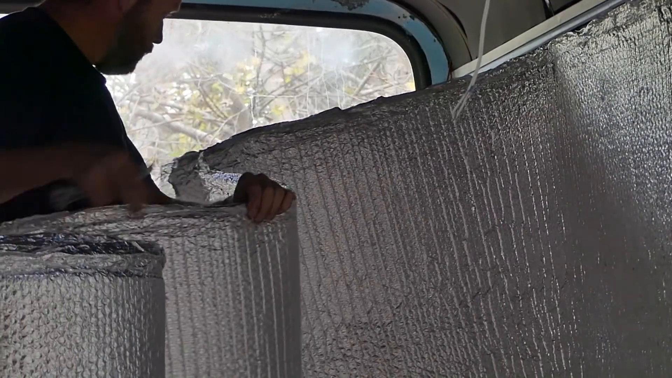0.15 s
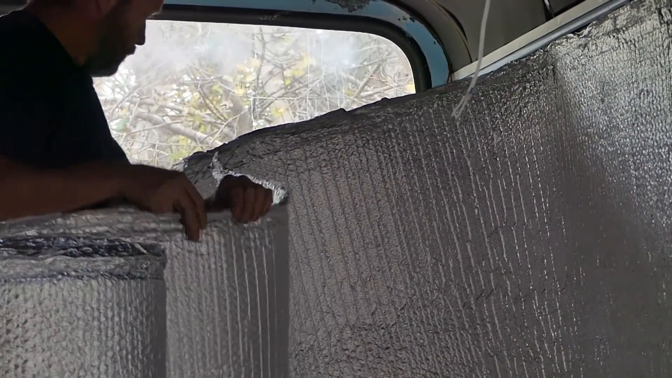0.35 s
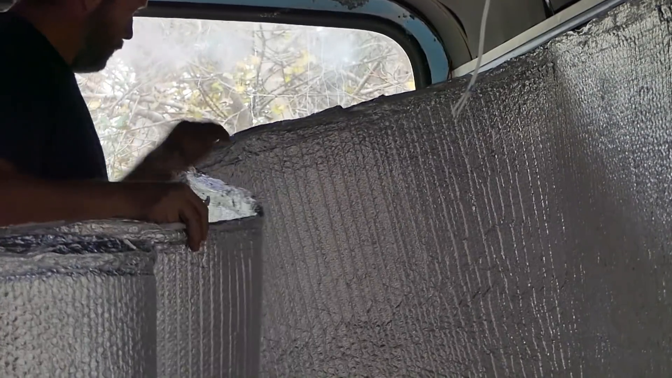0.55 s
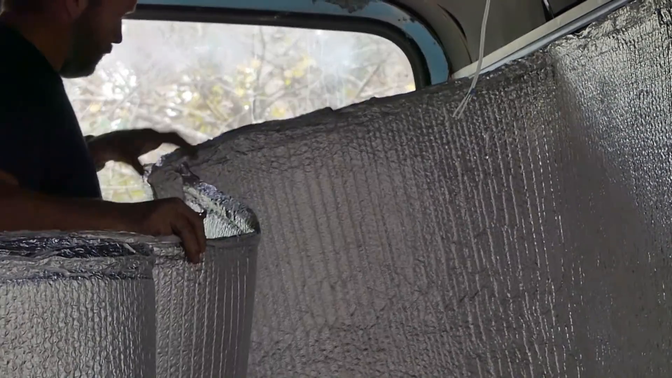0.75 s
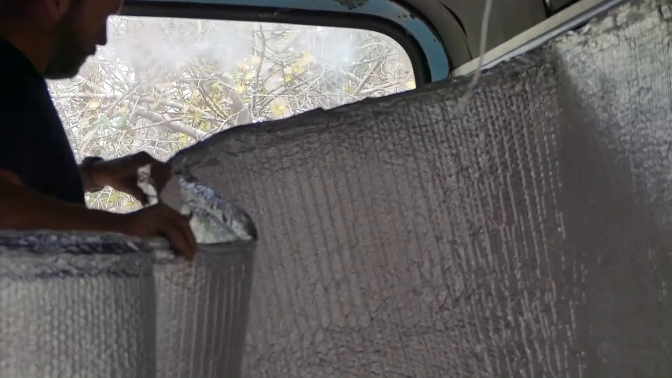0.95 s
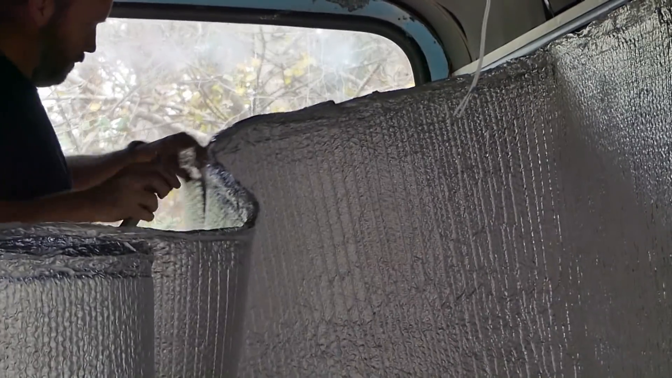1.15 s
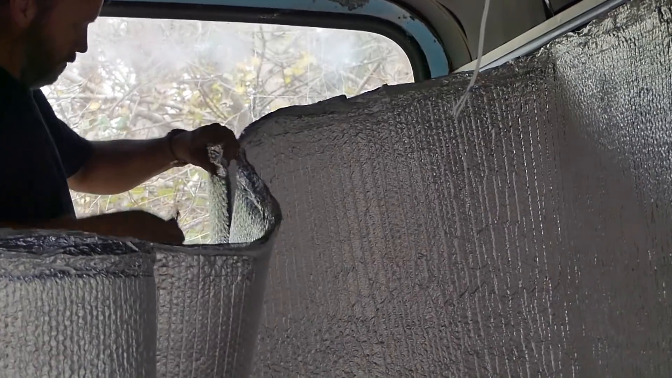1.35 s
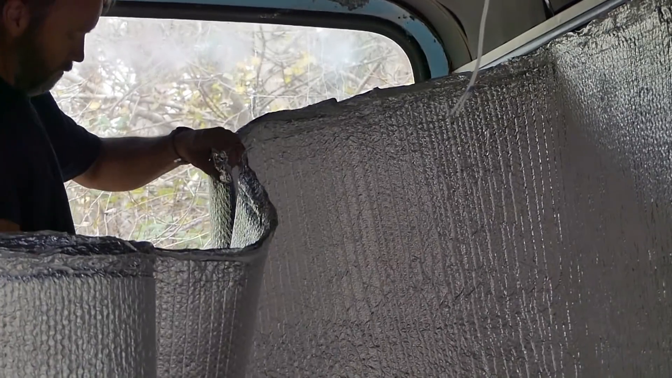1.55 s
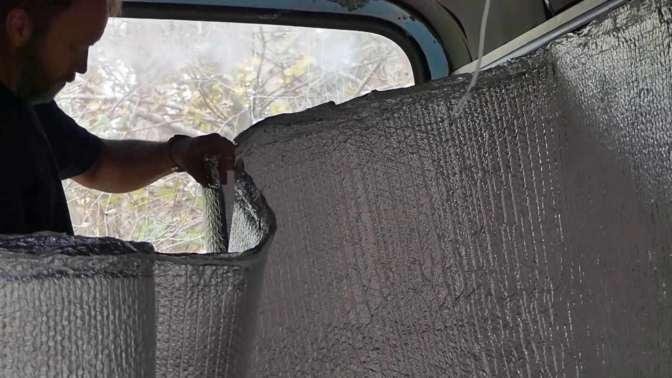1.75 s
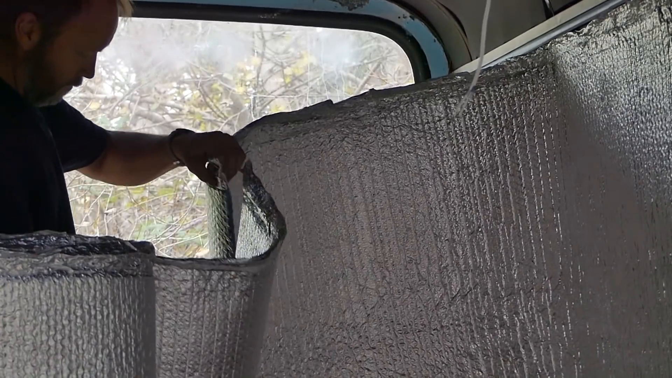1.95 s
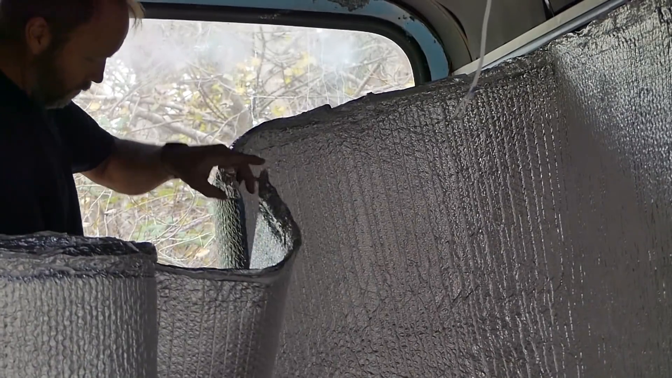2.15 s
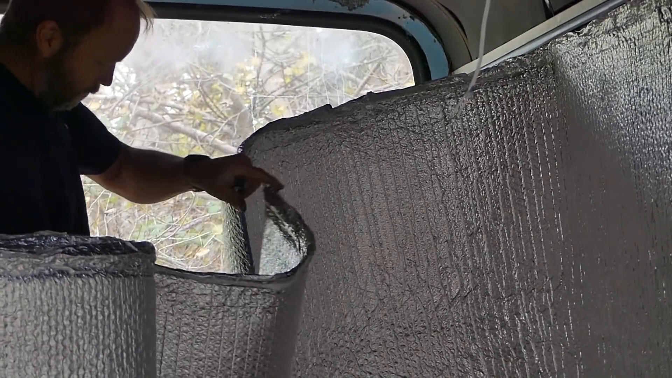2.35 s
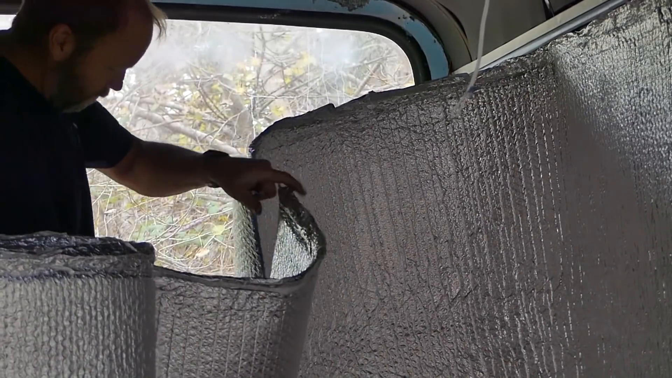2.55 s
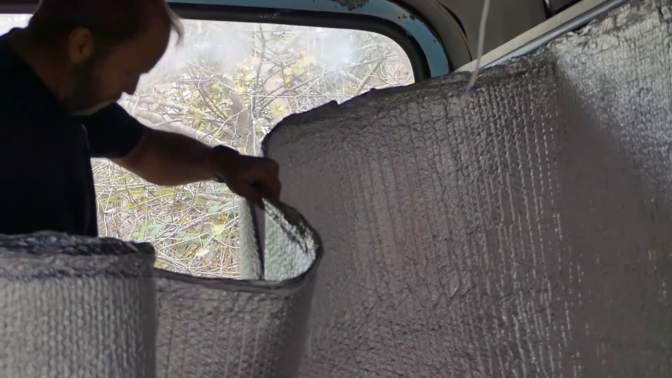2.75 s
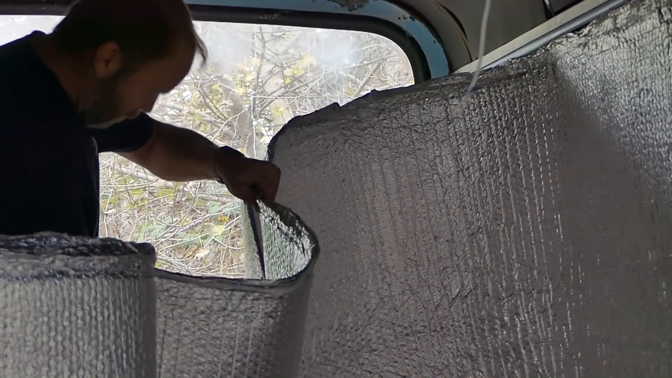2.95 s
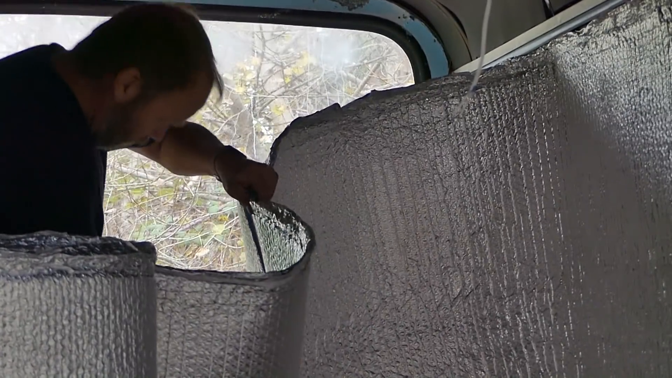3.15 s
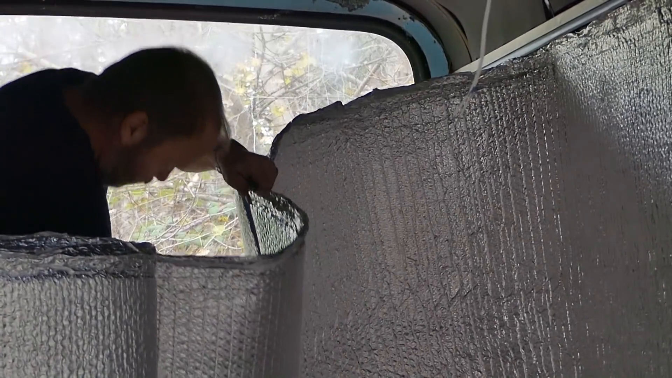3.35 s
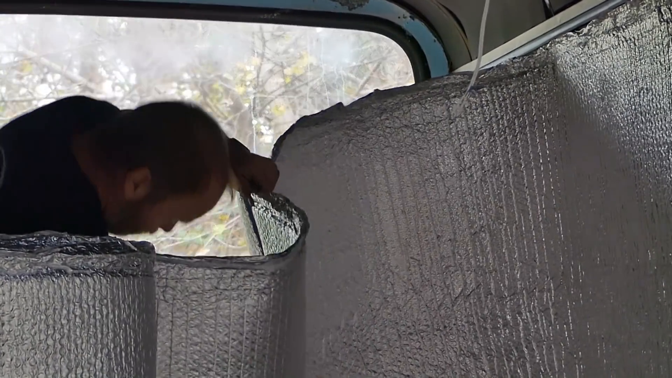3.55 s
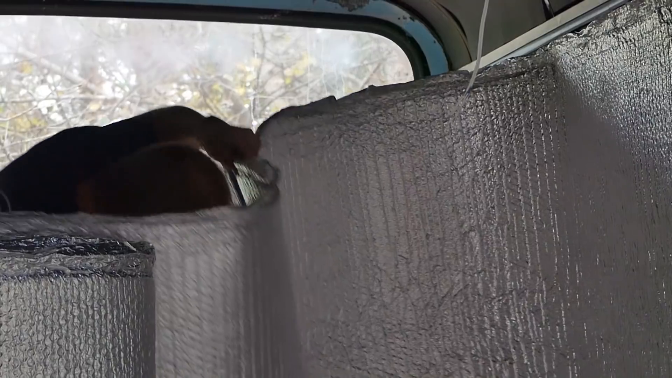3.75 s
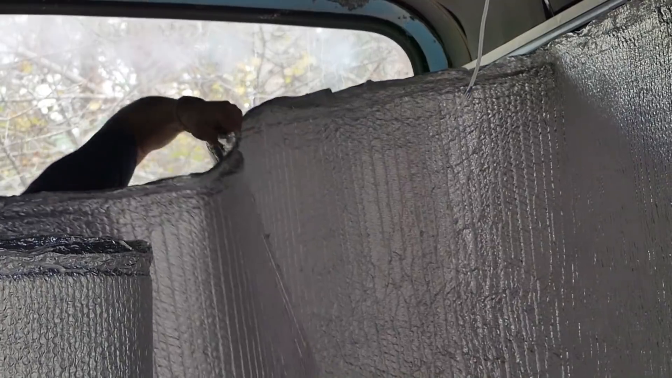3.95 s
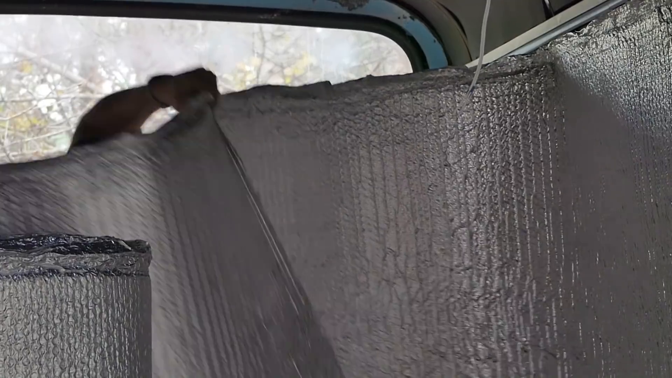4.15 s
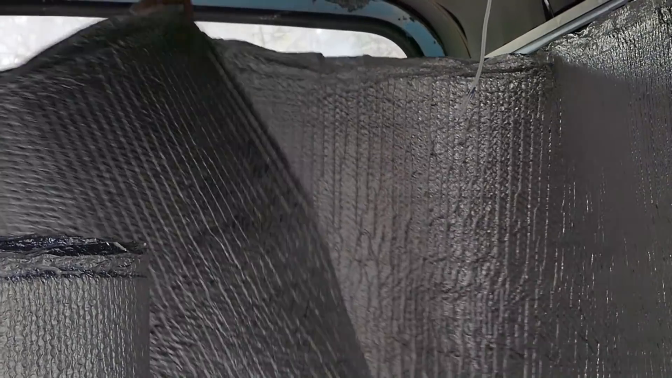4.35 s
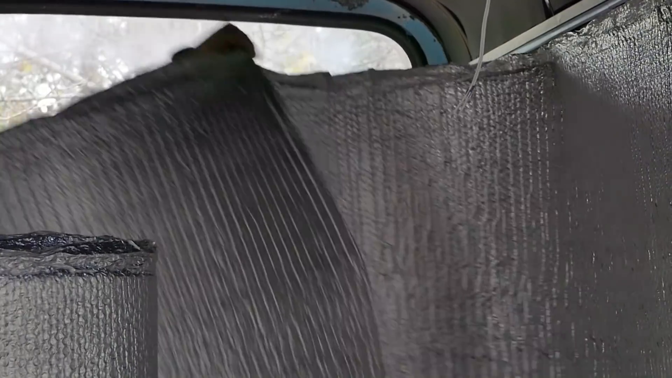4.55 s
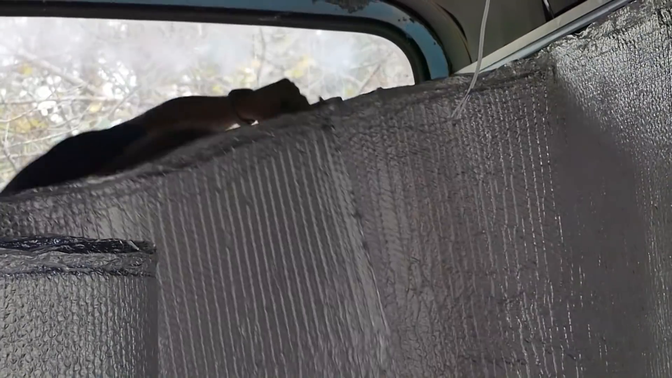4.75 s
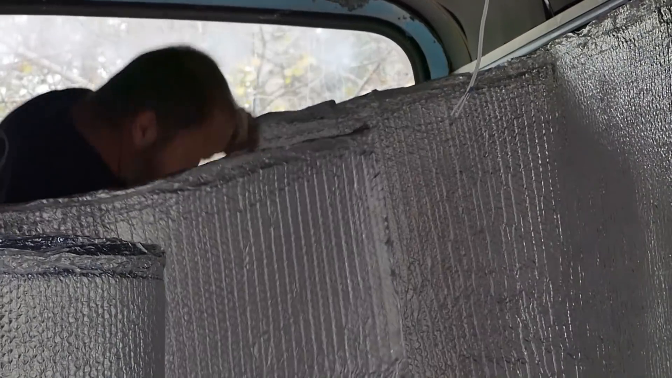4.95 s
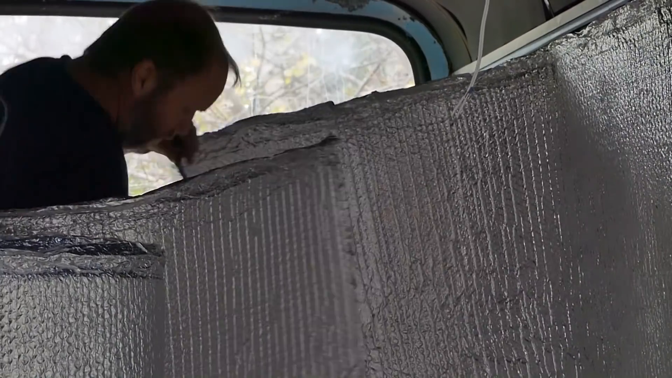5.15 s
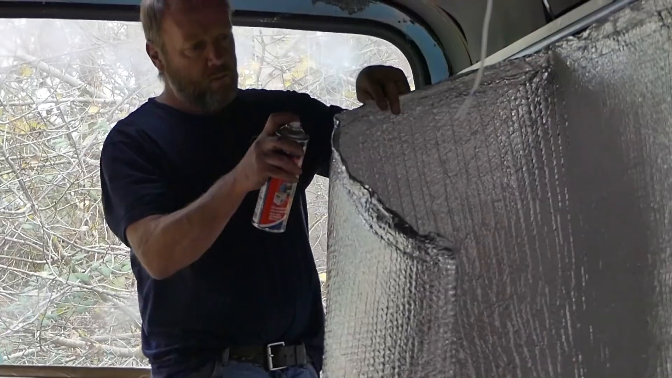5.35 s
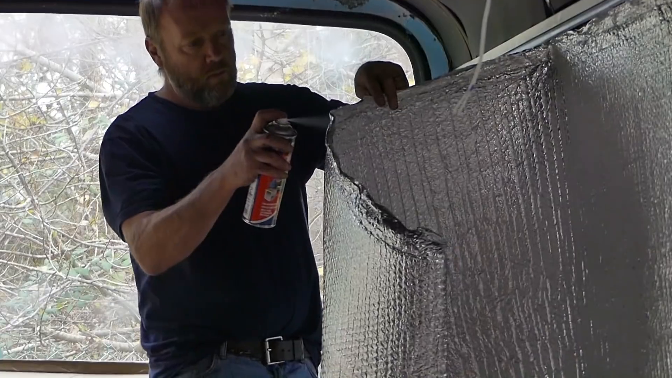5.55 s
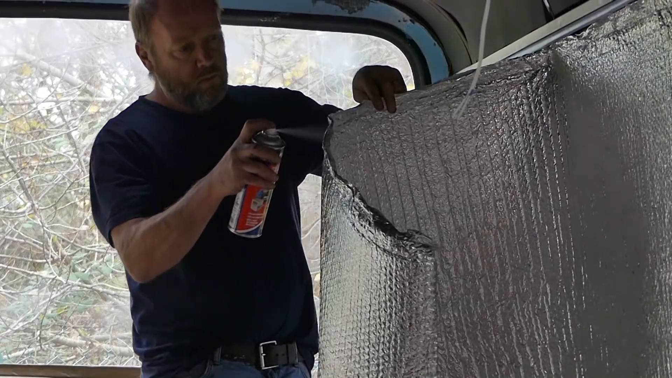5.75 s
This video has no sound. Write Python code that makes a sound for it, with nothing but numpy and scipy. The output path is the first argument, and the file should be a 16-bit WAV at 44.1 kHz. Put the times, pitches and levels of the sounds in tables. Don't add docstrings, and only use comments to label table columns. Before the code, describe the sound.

Foil-faced bubble insulation crinkles, ticks and thumps under handling, is dragged with loud sharp cracks, then a spray can hisses.

```python
import sys
import numpy as np
from scipy import signal
from scipy.fft import rfft, irfft
from scipy.io import wavfile
from scipy.ndimage import uniform_filter1d

SR = 44100
rng = np.random.default_rng(int(sys.argv[2]) if len(sys.argv) > 2 else 0)


def to_wav(sig):
    pcm = np.clip(np.atleast_2d(sig), -1, 1) * 32767
    pcm = np.round(pcm).astype(np.int16)
    wavfile.write(sys.argv[1], SR, pcm.T)


def linear_from_db(decibels):
    return 10 ** (np.asarray(decibels, float) / 20)


N = 256220

# frequency in Hz, density in dB per Hz.
AIR_SPECTRUM = [(30, -21), (160, -6.5), (430, 0.5), (870, -8), (1200, -9.5), (2000, -15.5), (3500, -12.5),
                (5500, -17), (7500, -20), (10000, -17), (15500, -16.5)]
AIR_DB, AIR_AFTER_HIGHPASS_HZ = -46.5, 95
# frequency in Hz, density in dB per Hz.
RUMBLE_SPECTRUM = [(30, -8), (60, -12), (100, -7), (125, 7), (170, -1), (260, -11), (400, -49)]
RUMBLE_DB = -66.5

# start of full strength in seconds, hold in seconds,
# crinkle in dB, sparkle in dB over the crinkle.
CREASES = [(-0.01, 0.092, -44.5, -6), (0.155, 0.004, -40.5, -5.5), (0.214, 0.095, -46, -9),
           (0.389, 0.053, -45, -3), (0.467, 0.058, -37, -7.5), (0.572, 0.065, -40.5, -7.1),
           (0.737, 0.0028, -34.5, -16), (0.793, 0.088, -39, -10), (0.963, 0.11, -37.5, -5),
           (1.181, 0.24, -40.5, -8), (1.5, 0.099, -41.5, -8), (1.653, 0.13, -43, -9),
           (1.84, 0.029, -45, -8), (1.947, 0.16, -46, -4.5), (2.07, 0.087, -48, -7),
           (2.285, 0.092, -44, -5.5), (2.398, 0.016, -38, -11), (2.498, 0.048, -41.5, -7),
           (2.694, 0.1, -41, -6), (2.827, 0.11, -42.5, -8), (3.001, 0.18, -41, -4.5),
           (4.415, 0.077, -36, -9.5), (4.534, 0.075, -44.0, -9), (4.671, 0.11, -35, -10),
           (4.801, 0.051, -38.5, -9), (4.893, 0.12, -41, -8.5), (5.024, 0.051, -45, -17),
           (5.139, 0.003, -38.8, -5.5), (5.173, 0.074, -44.5, -4.5), (5.277, 0.02, -39.5, -8.5)]
CREASE_RISE_DB_PER_S, CREASE_FALL_DB_PER_S = 165, 253
# start of full strength in seconds, hold in seconds,
# drumming in dB, scrape in dB over the drumming.
PUSHES = [(-0.015, 0.014, -41.5, -0.5), (0.069, 0.092, -58.5, 12), (0.17, 0.0027, -38.5, -3),
          (0.276, 0.031, -50, -6), (0.381, 0.065, -48.5, 3), (0.462, 0.0075, -43.5, -3.5),
          (0.62, 0.073, -45, -0.5), (0.728, 0.043, -43, 3.5), (0.784, 0.14, -37.5, -2),
          (1.01, 0.055, -37, -2), (1.283, 0.012, -52.5, 1), (1.39, 0.18, -48, -1.5),
          (1.58, 0.087, -50.5, 0.5), (1.765, 0.017, -48.5, 1.5), (1.964, 0.041, -43.5, -4),
          (2.105, 0.006, -54.5, -2), (2.26, 0.03, -49, 0), (2.363, 0.086, -51.5, -1),
          (2.49, 0.059, -67.5, 9), (2.681, 0.097, -54, 1), (2.8, 0.05, -45, -3), (2.98, 0.12, -64, 3),
          (4.398, 0.13, -43, -4.5), (4.53, 0.17, -54, 2), (4.68, 0.005, -72, 24),
          (4.758, 0.0035, -33.5, -8.5), (4.892, 0.079, -54, 5.5), (5.009, 0.004, -53, -8),
          (5.142, 0.004, -40, -2.5), (5.268, 0.06, -48.5, -4)]
PUSH_RISE_DB_PER_S, PUSH_FALL_DB_PER_S = 276, 141
# start of full strength in seconds, hold in seconds,
# crinkle in dB, drumming in dB over the crinkle, scrape in dB over the crinkle.
DRAGS = [(3.163, 0.0047, -32.5, 3, -8), (3.222, 0.039, -31.5, 7.5, 0), (3.267, 0.055, -28, 7, 2.5),
         (3.345, 0.084, -27, 5, 3.5), (3.456, 0.024, -32, 10.5, -0.5), (3.49, 0.0088, -42, -1, 0),
         (3.52, 0.042, -51, 16, -8), (3.572, 0.051, -29.5, 6.5, 4.5), (3.645, 0.069, -27, 3.5, 3.5),
         (3.735, 0.062, -30, 6.5, 4.5), (3.82, 0.055, -29.5, 7, 3.5), (3.885, 0.05, -31.5, 6.5, 2.5),
         (3.977, 0.024, -38, 7, -3), (4.043, 0.021, -35.5, 0.5, -4.5), (4.118, .015, -33, 7.5, 2.5),
         (4.145, 0.025, -28, 6, 2.5), (4.177, 0.16, -29.5, 7, 4), (4.324, 0.025, -32, 9, 7.5)]
DRAG_RISE_DB_PER_S, DRAG_FALL_DB_PER_S = 546, 306
DRAG_SPARKLE_DB = -10
REST_DB = -91
SCRAPE_DB = 2.5
CLUMP_DB, CLUMP_S = 1.2, 0.003
FLICKER_DB, FLICKER_S = 1.5, 0.017

# frequency in Hz, density in dB per Hz.
CRINKLE_SPECTRUM = [(880, -40), (1500, -15.5), (1910, -8), (2650, -7.5), (3100, -2), (3980, 0.5),
                    (6330, -2.5), (7690, -9), (9000, -9.5), (11700, -15), (19800, -120)]
# frequency in Hz, density in dB per Hz.
SPARKLE_SPECTRUM = [(6000, -12), (7700, 2.5), (8500, -0.5), (10000, 6.5), (11500, -1.5), (13000, 2.5),
                    (14500, -4.5), (15600, -7)]
# frequency in Hz, density in dB per Hz.
SCRAPE_SPECTRUM = [(380, -18), (600, -2.5), (800, 4.5), (1070, 3.5), (1250, 1.5), (1600, -1), (2050, -1),
                   (2800, -2), (3700, -9), (6000, -80.5)]
# frequency in Hz, width in Hz, level in dB.
FACES = [(1526, 96, -23.5), (2030, 170, -16), (3220, 210, -13), (4040, 210, -16)]
# frequency in Hz, width in Hz, level in dB.
SHEET_MODES = [(125, 51, -7), (195, 45, 1), (279, 43, -4), (335, 28, -2), (434.7, 28, -0.5),
               (501.7, 20.6, -1), (574.4, 26.4, 0), (656, 69, -3), (754.4, 17, -5), (834, 28, -4),
               (980, 110, -9), (1074, 22, -6.5), (1193, 59, -6), (2060, 11, -15)]
# time in seconds, pitch in Hz.
BULGE_PITCH = [(0, 416), (.2, 405), (.8, 454), (1.1, 477), (1.62, 480), (1.95, 345), (2.78, 375),
               (3.07, 344), (3.2, 435), (3.75, 434), (3.95, 286), (4.1, 257), (4.21, 380), (4.36, 356),
               (4.8, 370), (5.3, 408)]

# time in seconds, peak in dB, pitch in Hz.
TICKS = [(.0019, -40, 1120), (.0571, -37, 1080), (.1126, -31, 1250), (.4171, -38, 1200), (.5028, -26, 3830),
         (.5287, -27, 4390), (.5754, -30, 3960), (0.722, -22, 5400), (.7296, -19, 3900),
         (.7292, -19.5, 6300), (.7336, -22, 4560), (.7365, -22, 5300), (.741, -23, 4600),
         (.7594, -23, 1110), (.8573, -26, 3790), (1.0624, -28, 5600), (1.2181, -26, 4050),
         (1.3154, -25, 4180), (1.4197, -26, 3880), (1.4258, -27, 3960), (1.6008, -32, 3400),
         (2.4154, -30, 4180), (2.8024, -30, 4180), (2.9084, -31, 5770), (3.0516, -31, 4000),
         (3.2397, -15, 3700), (3.3513, -14, 1110), (3.6288, -16, 3750), (3.678, -15, 3530),
         (3.7884, -16, 3920), (3.837, -17, 3620), (3.9285, -26, 3360), (4.153, -20, 1120),
         (4.1539, -17, 3270), (4.1791, -24, 2550), (4.2004, -22, 3750), (4.2382, -21, 3320),
         (4.294, -14, 1500), (4.3095, -16, 1080), (4.319, -17, 5500), (4.4398, -24, 4030),
         (4.6928, -36, 730), (4.8015, -28, 4480), (4.9694, -30, 4050), (5.1255, -38, 2100)]
TICK_RING_S, TICK_RISE_S = 0.001, 0.00015
# start in seconds, level in dB, pitch in Hz,
# rise in seconds, ring in seconds.
BOOMS = [(0.441, -57, 116, 0.03, 0.31), (0.161, -37.5, 336, 0.011, 0.33), (0.859, -39, 490, 0.014, .2),
         (1.001, -41, 460, 0.019, 0.27), (1.06, -35, 564, 0.043, 0.17), (1.278, -40.5, 900, 0.0049, 0.034),
         (1.305, -46, 1020, 0.0047, 0.046), (1.409, -45, 139, 0.048, .2), (1.96, -40.5, 125, 0.025, 0.22),
         (2.84, -43.5, 222, .03, 0.083), (3.299, -23.5, 1070, 0.071, 0.32), (3.36, -20, 564, 0.051, 0.27),
         (3.468, -21, 214, 0.0088, 0.14), (3.88, -28.5, 187, 0.047, 0.49), (4.15, -26, 2022, 0.035, 0.41),
         (4.201, -19.5, 499, 0.021, 0.11), (4.272, -27, 190.8, 0.0062, 0.52), (4.329, -23, 359, 0.017, 0.3),
         (4.68, -56, 700, 0.03, 0.15), (4.752, -26.5, 303, 0.0068, 0.084), (4.78, -35, 207, 0.018, 0.078),
         (0.0, -46, 111, 0.0059, 0.087), (2.81, -51, 108, 0.034, 0.22), (4.42, -47, 106, 0.019, .15),
         (.72, -39, 891, 0.0088, .3), (.77, -38, 496, 0.027, .15), (0.829, -40, 445, 0.017, .1),
         (0.901, -36, 484, 0.019, 0.15), (1.045, -38, 488, 0.017, 0.091), (3.25, -21, 405, 0.014, 0.16),
         (3.42, -25, 587, 0.024, 0.16), (3.56, -26.5, 990, 0.035, 0.26), (3.62, -23, 436.7, 0.036, 0.21),
         (3.675, -21.5, 334, 0.024, 0.14), (3.66, -26, 2070, 0.028, .1), (3.78, -26.5, 972, 0.048, 0.45),
         (3.83, -22.5, 235, 0.033, 0.12), (3.874, -23, 458, 0.025, 0.073), (4.759, -36, 470, 0.015, 0.12),
         (5.0, -41.5, 382, 0.011, 0.094),
         (1.76, -53, 115, 0.033, .15), (1.97, -47, 300, .03, .2), (2.27, -52.5, 170, .03, .15),
         (2.37, -52, 148, .04, .25), (3.3, -51, 205, 0.027, .12), (2.8, -46, 545, 0.047, .2),
         (3.5, -52, 325, 0.037, .25), (4, -35.5, 320, .02, 0.41), (4.8, -55, 420, 0.025, 0.3),
         (5.132, -35, 2020, 0.0055, 0.048), (4.1, -42, 1640, 0.0056, .07), (5.135, -32, 860, 0.0038, .09),
         (3.4, -23, 770, 0.023, 0.14), (4.15, -26, 630, 0.022, 0.38), (3.6, -28, 550, 0.03, .15),
         (4.746, -27, 340, .008, 0.12), (1.085, -40, 430, 0.023, .1), (.855, -39, 860, 0.017, 0.091),
         (4.765, -35, 600, .01, .1), (3.21, -28, 1090, 0.019, .3), (4.335, -31, 2300, .015, 0.057),
         (3.6, -33.5, 195, .04, 0.26)]
# time in seconds, peak in dB, pitch in Hz, thump in dB over the crack,
# width as a share of pitch.
CRACKS = [(0.15, -26.5, 5000, -5, 0.83), (0.723, -21, 5260, -11, 0.17), (0.7277, -18.5, 5200, -21, 0.29),
          (1.167, -38, 3230, -11, .2), (1.755, -27, 11000, -24, 0.54), (2.056, -30, 4350, -34, 0.28),
          (2.31, -29, 4260, -20, .18), (2.385, -33, 4300, -15, .47), (2.93, -26, 11900, -30, .25),
          (3.164, -30, 3680, -11, .25), (3.209, -13.5, 3300, -13, 0.034), (3.217, -15.5, 3460, -9, 0.078),
          (3.266, -10, 3250, -6, 0.24), (3.273, -8, 3800, -16, 0.15), (3.2877, -12.5, 3230, -15, 0.23),
          (5.14, -24, 1700, -3, 0.3), (3.344, -11, 3350, -33, 0.098), (3.5508, -22, 2900, 1, 0.44),
          (3.565, -12, 3200, -12, 0.13), (4.11, -27, 1620, -22, .2), (4.146, -18, 1550, -29, 0.041),
          (4.349, -12, 2030, -36, .15), (5.1269, -31, 3300, -21, 0.53), (5.131, -22, 1200, -2, 0.41),
          (0.37, -34, 4840, -17, 0.28), (0.393, -33, 4100, -20, .3), (1.4, -42, 3780, -20, .25),
          (1.8417, -29, 3120, -23, 0.28), (1.927, -34, 4130, -22, .3), (2.1294, -33, 3820, -23, 0.23),
          (2.197, -29.5, 4370, -22, 0.2), (2.6204, -38, 4860, -15, 0.46), (3.36, -12, 2310, -15, 0.58),
          (3.397, -16, 2300, -5, 0.37), (3.473, -21, 1900, -7, .45), (3.895, -18, 2200, -16, 0.32),
          (4.038, -27, 3900, -1.5, .3), (4.2, -17, 1790, 1.5, 0.57), (4.308, -19, 1700, -14, 0.43),
          (4.326, -16, 3220, -25, .08)]
TEAR_S, TEAR_S_PER_WIDTH = 0.0092, 0.096
# start in seconds, length in seconds, level in dB, first pitch in Hz,
# last pitch in Hz.
HUMS = [(.83, .05, -37, 438, 447), (.885, .065, -39, 467, 490), (1.0, 0.071, -35, 460, 460),
        (1.084, 0.036, -39, 364, 320), (0.761, 0.096, -41.5, 901, 940), (3.62, 0.089, -23.5, 450, 428),
        (3.7, 0.054, -26, 480, 470), (3.871, 0.047, -26, 460, 450), (4.676, 0.179, -32.5, 355.6, 410),
        (4.771, .05, -41, 260, 200), (4.838, 0.065, -46, 382, 360), (5.17, 0.042, -42.5, 352, 330),
        (5.635, .1, -36, 369, 389), (5.66, 0.094, -42, 151, 150), (3.03, .05, -57, 209, 210)]

CUT_S = 5.3145
# start of full strength in seconds, hold in seconds, jet in dB.
VALVE = [
    (5.405, .03, -55),
    (5.46, 0.042, -36.5),
    (5.53, 0.012, -33.5),
    (5.535, 0.24, -27.5),
]
VALVE_RISE_DB_PER_S, VALVE_FALL_DB_PER_S = 315, 100
# start of full strength in seconds, hold in seconds, hiss in dB.
LEAK = [
    (5.452, 0.038, -39.5),
]
# start of full strength in seconds, hold in seconds, level in dB.
NUDGES = [
    (5.5, .35, -55),
    (5.67, 0.022, -40.5),
]
NUDGE_RISE_DB_PER_S, NUDGE_FALL_DB_PER_S = 450, 172
# frequency in Hz, density in dB per Hz.
JET_SPECTRUM = [(410, -48), (700, -14), (1250, -8), (1340, -9), (1710, -3), (2130, -8), (2300, -7),
                (2520, -4), (3140, -0.5), (4240, -3.5), (6670, -0.5), (8200, -4), (8980, -1.5),
                (12100, 0.5), (15500, -4.5)]
# delay in seconds, level in dB.
JET_ECHOES = [(.0021, -40), (.0047, -19), (.0083, -13.5)]
# frequency in Hz, width in Hz.
JET_DIPS = [(2350, 120), (4300, 45), (5450, 40), (8050, 140)]

# time in seconds, share off the walls for the drumming in dB,
# the same for the crinkle in dB.
WALL_SHARE = [(0, -2, -2.5), (3.05, 7.5, -5), (3.2, -2.5, 0), (4.4, -4, -1.5), (4.6, -2, -2.5),
              (5.3, 2, -4.5), (5.8, -11, -3.5)]
# frequency in Hz, t60 in seconds.
WALL_T60 = [(150, 0.12), (500, 0.085), (2000, 0.044), (6000, 0.032), (14000, 0.096)]
# frequency in Hz, gain in dB.
WALL_COLOUR = [(150, -12.5), (600, -9), (1500, -1.5), (4000, 0.5), (7500, -3.5), (9000, 0.5), (15000, 1.5)]
# frequency in Hz, gain in dB.
JET_WALL_COLOUR = [(150, 4), (1200, 1.5), (2200, -2), (8000, -5), (9200, 1.5), (15000, 2)]


def evened(x):
    return x / np.sqrt(np.mean(x ** 2) + 1e-20)


def smooth_noise(shape, samples):
    return uniform_filter1d(rng.standard_normal(shape), samples)


def read(points, hz):
    f, value = np.transpose(points)
    return np.interp(np.log(hz + 1), np.log(f + 1), value, left=value[0], right=value[-1])


def curves(rows):
    s, *columns = np.transpose(rows)
    return [np.interp(np.arange(N) / SR, s, c) for c in columns]


def coloured(x, points):
    hz = abs(np.fft.fftfreq(4096, 1 / SR))
    log_gain = np.log(linear_from_db(np.maximum(read(points, hz), -90)))
    taps = np.fft.ifft(np.exp(np.conj(signal.hilbert(log_gain)))).real[:2048]
    return signal.oaconvolve(x, taps / np.linalg.norm(taps))[:len(x)]


def highpass(x, order, hz):
    return signal.sosfilt(signal.butter(order, hz, "high", fs=SR, output="sos"), x)


def notched(x, hz, width_hz):
    return signal.lfilter(*signal.iirnotch(hz, hz / width_hz, SR), x)


def snaps(per_s, spread_db, hiss):
    size = linear_from_db(spread_db * np.minimum(rng.exponential(1, N), 4)) * rng.choice([-1, 1], N)
    clicks = evened(size * (rng.random(N) < per_s / SR))
    return np.sqrt(1 - hiss) * clicks + np.sqrt(hiss) * rng.standard_normal(N)


def shuffled(x):
    return x * rng.choice([-1, 1], len(x))


def patchy(x, depth_db, frames, bins):
    hz, t, z = signal.stft(x, nperseg=256)
    field = uniform_filter1d(smooth_noise(z.shape, frames), bins, 0)
    return evened(signal.istft(z * linear_from_db(depth_db * evened(field)), nperseg=256)[1][:N])


def strokes(rows, rise_db_per_s, fall_db_per_s):
    t = np.arange(0, N + 64, 64) / SR
    s, hold, db, *over_db = np.transpose(rows)[..., None]
    rise_db = rise_db_per_s * np.maximum(s - t, 0)
    fall_db = fall_db_per_s * np.maximum(t - s - np.abs(hold), 0)
    shape_db = db - rise_db - fall_db
    powers = [(linear_from_db(shape_db + more_db) ** 2).sum(0) for more_db in [0] + over_db]
    return [np.interp(np.arange(N) / SR, t, power) for power in powers]


def level(power):
    return 10 * np.log10(power + linear_from_db(REST_DB) ** 2)


def still_air():
    common, left, right = (coloured(n, AIR_SPECTRUM) for n in rng.standard_normal((3, N)))
    return linear_from_db(AIR_DB - 8.5) * (0.2 * common + 1.51 * np.array([left, right]))


def rumble():
    lumps = linear_from_db(4.0 * evened(smooth_noise((2, N), 5000)))
    return linear_from_db(RUMBLE_DB) * lumps * [coloured(n, RUMBLE_SPECTRUM) for n in rng.standard_normal((2, N))]


def effort():
    crease, fine = strokes(CREASES, CREASE_RISE_DB_PER_S, CREASE_FALL_DB_PER_S)
    drum, scrape = strokes(PUSHES, PUSH_RISE_DB_PER_S, PUSH_FALL_DB_PER_S)
    drag, drag_drum, drag_scrape = strokes(DRAGS, DRAG_RISE_DB_PER_S, DRAG_FALL_DB_PER_S)
    sparkle_db = level(fine + linear_from_db(DRAG_SPARKLE_DB) ** 2 * drag)
    return level(crease + drag), sparkle_db, level(drum + drag_drum), level(scrape + drag_scrape) + SCRAPE_DB


def pops(level_db, per_s, low_hz, high_hz, cycles, count):
    train = linear_from_db(level_db) * snaps(per_s, spread_db=4.5, hiss=0)
    facet, t, out = rng.integers(0, count, N), np.arange(1500) / SR, 0
    for k, hz in enumerate(np.geomspace(low_hz, high_hz, count)):
        ring = np.sin(2 * np.pi * hz * t) * np.exp(-t * hz / cycles)
        out = out + signal.oaconvolve(train * (facet == k), ring / np.linalg.norm(ring))[:N]
    return out


def singing_faces(rubbed):
    out = 0
    for hz, width_hz, db in FACES:
        sung = signal.lfilter(*signal.iirpeak(hz, hz / width_hz, SR), rubbed)
        out = out + linear_from_db(db) * sung / np.sqrt(np.pi * width_hz / SR)
    return out


def drummed(x):
    t, ring = np.arange(6000) / SR, 0
    for k, (hz, width_hz, db) in enumerate(SHEET_MODES):
        mode = np.exp(-np.pi * width_hz * t) * np.sin(2 * np.pi * hz * t)
        ring = ring + (-1) ** k * linear_from_db(db) * np.sqrt(width_hz) * mode
    return signal.oaconvolve(x, ring / np.linalg.norm(ring))[:N]


def resonate(x, hz, width_hz):
    turn = np.exp(2j * np.pi * np.cumsum(hz) / SR)
    r = np.exp(-np.pi * width_hz / SR)
    smooth = signal.lfilter([1 - r], [1, -r], x / turn)
    return 2 * (turn * smooth).real / np.sqrt(2 * np.pi * width_hz / SR)


def foil():
    crinkle_db, sparkle_db, drum_db, scrape_db = effort()
    bulge_hz, = curves(BULGE_PITCH)
    skin = patchy(snaps(per_s=2500, spread_db=-1.5, hiss=0.81), depth_db=1.0, frames=14, bins=9)
    slips = patchy(snaps(per_s=830, spread_db=2.5, hiss=0.84), depth_db=0.5, frames=16, bins=3)
    clumps = linear_from_db(CLUMP_DB * evened(smooth_noise(N, round(CLUMP_S * SR))))
    skin, slips = evened(skin * clumps), evened(slips * clumps)
    skin = evened(skin + 0.28 * slips)

    crinkle = coloured(linear_from_db(crinkle_db + 0.9) * skin, CRINKLE_SPECTRUM)
    flurry = evened(smooth_noise(N, round(FLICKER_S * SR)))
    sparkle = coloured(linear_from_db(sparkle_db + FLICKER_DB * flurry) * shuffled(skin), SPARKLE_SPECTRUM)
    facets = pops(scrape_db - 17.0, per_s=780, low_hz=1085, high_hz=4470, cycles=4.5, count=8)
    faces = singing_faces(linear_from_db(scrape_db) * shuffled(skin))

    drum = drummed(linear_from_db(drum_db - 1.5) * slips)
    bulge = resonate(linear_from_db(drum_db - 1.5) * shuffled(slips), bulge_hz, width_hz=60)
    scrape = coloured(linear_from_db(scrape_db - 3.5) * shuffled(slips), SCRAPE_SPECTRUM)
    return crinkle + sparkle + facets + faces, drum + bulge + scrape


def booms():
    out, t = np.zeros(N + SR), np.arange(12000) / SR
    for s, db, hz, rise_s, ring_s in BOOMS:
        waver_depth = 0.5 / np.sqrt(hz) * np.minimum(1, 500 / hz)
        waver = 1 + waver_depth * evened(smooth_noise(len(t), 600))
        swell = np.sin(np.pi / 2 * np.minimum(t / rise_s, 1)) ** 2
        decay = linear_from_db(db - 60 * np.maximum(t - rise_s, 0) / ring_s)
        out[round(s * SR):][:len(t)] += swell * decay * np.sin(2 * np.pi * hz * np.cumsum(waver) / SR)
    return out[:N]


def ticks():
    out, t = np.zeros(N + SR), np.arange(600) / SR
    for s, db, hz in TICKS:
        ring = np.minimum(t / TICK_RISE_S, 1) * np.exp(-t / TICK_RING_S) * np.sin(2 * np.pi * hz * t)
        out[round((s - TICK_RISE_S) * SR):][:len(t)] += linear_from_db(db) * ring
    return out[:N]


def cracks():
    burst, blow = np.zeros((2, N + SR))
    t = np.arange(4000) / SR
    for s, db, hz, thump_db, width in CRACKS:
        at, spread = round(s * SR), 1 + np.clip(width, 0.04, 0.5)
        tear_s = max(TEAR_S + TEAR_S_PER_WIDTH * width, 0.004)
        tear, push = rng.standard_normal((2, len(t))) * linear_from_db(-60 * t / tear_s)
        tear = tear + 3.3 / np.sqrt(spread - 1) * (t == 0)
        band_sos = signal.butter(1, [hz / spread, hz * spread], "band", fs=SR, output="sos")
        band = signal.sosfilt(band_sos, tear)
        burst[at:at + len(t)] += linear_from_db(db) * band / abs(band).max()
        blow[at:at + len(t)] += linear_from_db(db + thump_db - 1.5) * push
    return burst[:N], drummed(blow[:N])


def hums():
    out = np.zeros(N + SR)
    for s, length_s, db, first_hz, last_hz in HUMS:
        u = np.linspace(0, 1, round(length_s * SR))
        hz = first_hz + (last_hz - first_hz) * u
        out[round(s * SR):][:len(u)] += linear_from_db(db) * np.sin(np.pi * u) * np.sin(2 * np.pi * np.cumsum(hz) / SR)
    return out[:N]


def spray():
    jet_db = level(*strokes(VALVE, VALVE_RISE_DB_PER_S, VALVE_FALL_DB_PER_S))
    leak_db = level(*strokes(LEAK, VALVE_RISE_DB_PER_S, VALVE_FALL_DB_PER_S))
    rustle_db = level(*strokes(NUDGES, NUDGE_RISE_DB_PER_S, NUDGE_FALL_DB_PER_S))
    jet = patchy(snaps(per_s=4000, spread_db=2.5, hiss=0.85), depth_db=1.3, frames=30, bins=3)
    jet = evened(jet + sum(linear_from_db(db) * np.roll(jet, round(s * SR)) for s, db in JET_ECHOES))
    for hz, width_hz in JET_DIPS:
        jet = notched(jet, hz, width_hz)
    hiss = coloured(linear_from_db(jet_db) * jet, JET_SPECTRUM)
    leak = coloured(linear_from_db(leak_db) * shuffled(jet), SPARKLE_SPECTRUM)
    rustle = drummed(linear_from_db(rustle_db - 2.0) * snaps(per_s=720, spread_db=2.6, hiss=0.97))
    return hiss + leak, rustle


def swaying_dips(x):
    for hz, width_hz in JET_DIPS:
        depth = np.sin(np.pi * hz / 600 * np.arange(N) / SR) ** 2
        x = x + depth * (notched(x, hz, width_hz) - x)
    return x


def reflections(colour):
    taps = np.zeros((2, 12000))
    at = np.arange(100, 11980, 20) + rng.integers(0, 20, (2, 594))
    np.put_along_axis(taps, at, rng.choice([-1., 1.], at.shape), 1)
    hz, t, z = signal.stft(taps, SR, nperseg=256)
    tail = signal.istft(z * linear_from_db(-60 * t / read(WALL_T60, hz)[:, None]), SR, nperseg=256)[1]
    hz = np.fft.rfftfreq(tail.shape[1], 1 / SR)
    return irfft(rfft(tail / np.linalg.norm(tail[0])) * linear_from_db(read(colour, hz)))


def cabin(bright, deep, colour, spots=4):
    deep = highpass(deep, 2, 105)
    deep_db, bright_db = curves(WALL_SHARE)
    sent, out = linear_from_db(deep_db) * deep + linear_from_db(bright_db) * bright, 0
    wander = np.arange(N) / SR * 14
    for k in range(spots):
        here = np.cos(np.pi / 2 * np.minimum(abs((wander - k) % spots - 1), 1))
        echoes = reflections(colour)[:, :8000]
        out = out + signal.oaconvolve((here * sent)[None], echoes, axes=1)[:, :N]
    middle = out.mean(0)
    return bright + deep + middle + 0.74 * (out - middle)


def scene():
    after = np.clip((np.arange(N) / SR - CUT_S) / 0.00078, 0, 1)
    (skin, drum), (burst, thump), (jet, rustle), hum = foil(), cracks(), spray(), hums()
    bright = 0.89 * skin + burst + ticks()
    deep = 0.81 * drum + thump + booms() + hum
    handling = cabin(bright, deep, WALL_COLOUR) + rumble()
    spraying = cabin(0.96 * after * jet, after * (1.17 * rustle + hum), JET_WALL_COLOUR, spots=2)
    air = still_air()
    later = highpass(swaying_dips(spraying) + after * air, 3, AIR_AFTER_HIGHPASS_HZ)
    return (1 - after) * (handling + air) + later


def roll_off(x):
    return signal.sosfilt(signal.butter(12, 15740, fs=SR, output="sos"), x)


def record(dry):
    dipped = notched(dry, 7520, 7520 / 50)
    return roll_off(highpass(dipped, 2, 58))


dry = scene()
out = record(dry)
to_wav(out)
```